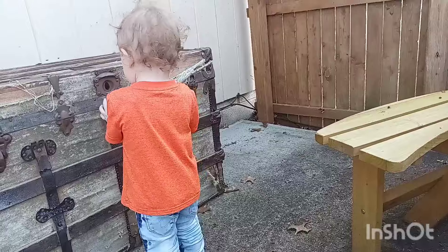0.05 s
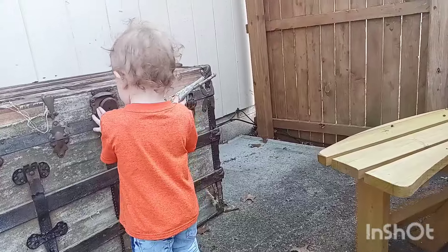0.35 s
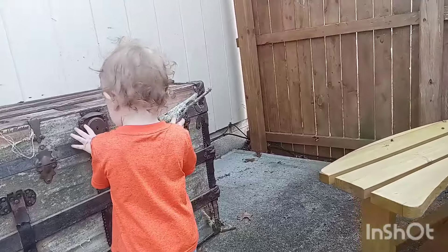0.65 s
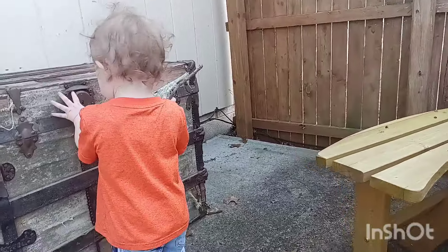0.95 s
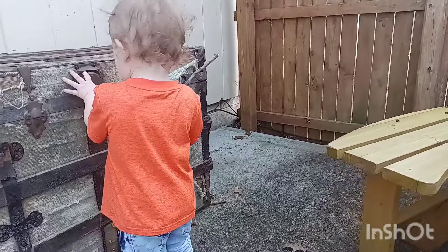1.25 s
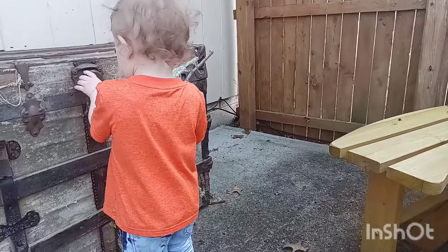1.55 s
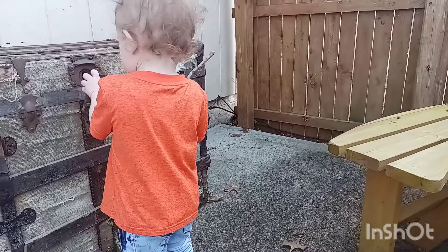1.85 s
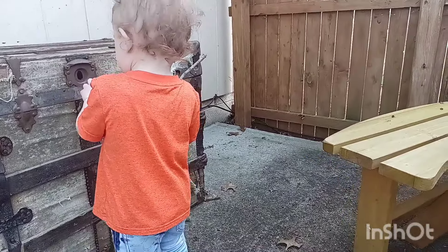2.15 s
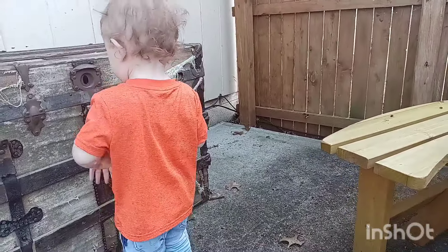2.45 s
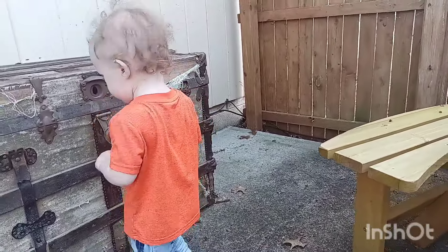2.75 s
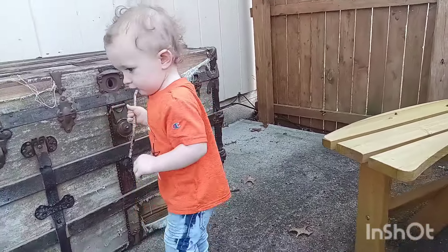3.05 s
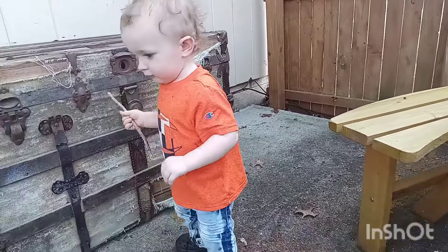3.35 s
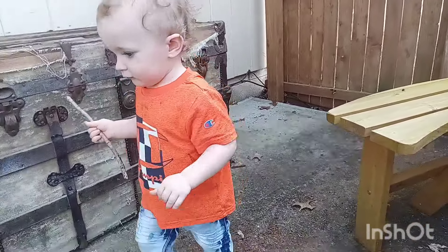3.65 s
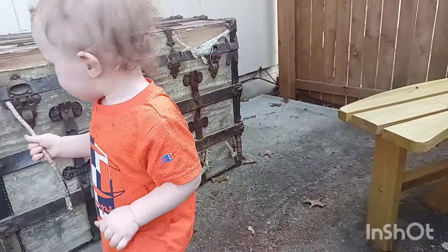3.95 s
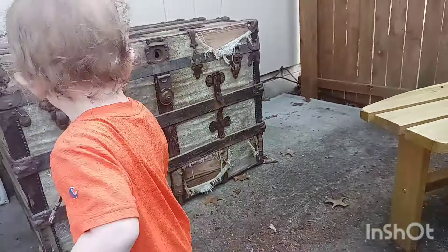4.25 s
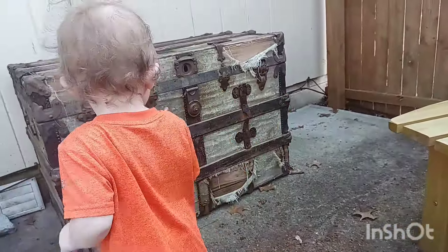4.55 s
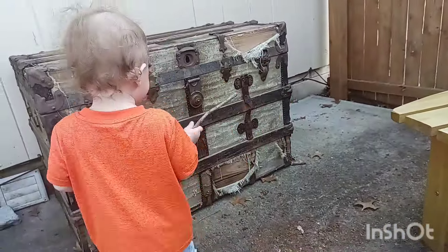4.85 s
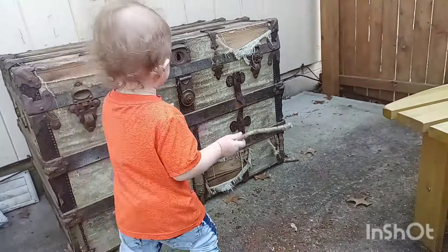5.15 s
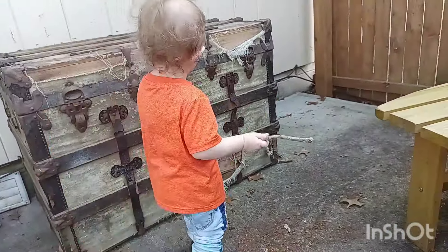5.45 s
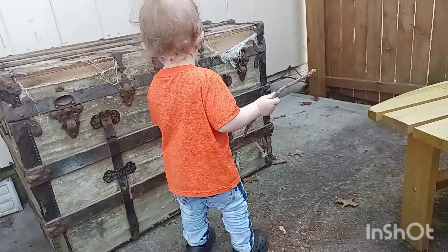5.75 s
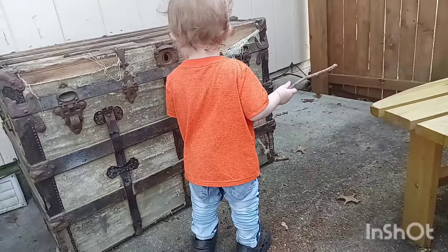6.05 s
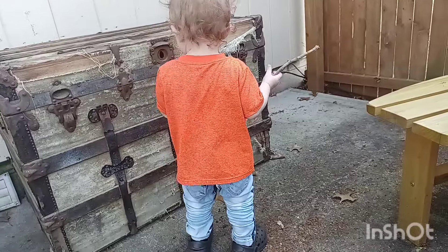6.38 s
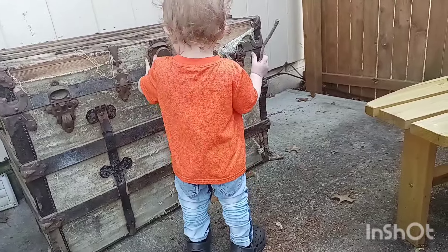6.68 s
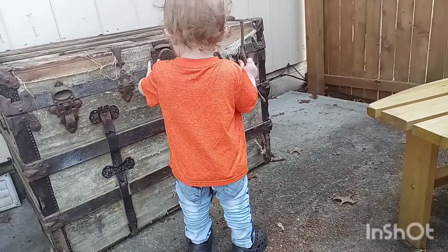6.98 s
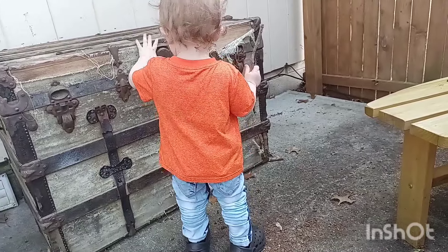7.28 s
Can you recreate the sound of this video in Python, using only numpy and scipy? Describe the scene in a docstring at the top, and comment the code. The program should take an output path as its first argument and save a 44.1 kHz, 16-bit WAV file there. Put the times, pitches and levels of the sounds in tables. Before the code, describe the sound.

A wooden trunk booms and rattles under a few knocks, then a stick clicks and small shoes scuff concrete, with faint birds early on.

```python
"""A soft bump on hollow wood, faint latch clinks and far bird whistles over a low outdoor hum.
A toddler plays at an old wooden trunk on a concrete patio, close to a hand-held phone. Hands bump the
box and rub its straps, shoes grind grit, a small stick taps. Loudest are the hard knocks: they boom in
the box modes, ring the planks, clash the iron fittings and rebound. Wall and fence add a short echo."""
import sys
import numpy as np
from scipy import signal
from scipy.fft import rfft, irfft, next_fast_len
from scipy.io import wavfile

SR = 44100
rng = np.random.default_rng(int(sys.argv[2]) if len(sys.argv) > 2 else 0)


def file_out(sig):
    """Save sig as 16-bit WAV at sys.argv[1]."""
    # one column per channel
    cols = np.atleast_2d(sig).T
    # limit, then scale
    lim = np.clip(cols, -1, 1)
    pcm = np.round(lim * 32767).astype(np.int16)
    wavfile.write(sys.argv[1], SR, pcm)


N = 327222
EVENT_T_S = np.arange(11264) / SR  # time within one event

# outdoor noise: f/Hz, relative density/dB
AIR_SPECTRUM = [(15, -21), (25, -29), (86, -3), (122, -8), (240, -10), (267, -15.5), (410, -18.5),
                (567, -25), (895, -22), (3530, -33.5), (3930, -33.5), (5010, -34), (7300, -28),
                (8580, -42.5), (15500, -60)]
# right port minus left, outdoor noise: f/Hz, gain/dB
AIR_RIGHT_EQ = [(100, -6.5), (400, -7), (1300, -3.5), (2400, -2.5), (4400, -3.5), (7600, -15), (11000, 1),
                (15000, 5)]
# right port minus left, all other sources: f/Hz, gain/dB
SOURCE_RIGHT_EQ = [(100, -6), (500, -6.5), (1300, -6.5), (2400, -11), (4400, -8), (7400, -25.5), (10000, 0),
                   (13000, -1.5)]
# deep far drone: t/s, relative level/dB
DEEP_DRONE_ENVELOPE = [(0, -63), (5, -62), (5.5, -51), (5.9, -43.5), (6.25, -45.5), (6.45, -61),
                       (7.05, -58), (7.4, -45.5)]
# upper far drone: t/s, relative level/dB
UPPER_DRONE_ENVELOPE = [(0, -47), (.6, -56), (1.3, -50.5), (2.2, -45), (3.9, -84), (5.8, -83), (6.1, -51.5),
                        (7.4, -56)]
# far birds: t/s, length/s, start f/Hz, end f/Hz, relative level/dB
BIRD_WHISTLES = [(.06, .19, 7350, 8020, -51.5), (0.205, 0.1, 4080, 3920, -54),
                 (0.363, 0.13, 4155, 3770, -47.5), (0.438, 0.19, 4030, 4050, -52.5),
                 (0.559, 0.0456, 4140, 3820, -40.5), (.88, 0.21, 3820, 3820, -70),
                 (1.21, .09, 4450, 4220, -59), (1.37, .16, 3930, 3925, -49)]

# iron fittings: f/Hz, relative density/dB
IRON_SPECTRUM = [(400, -29), (800, -11.5), (1400, -5), (1900, -5), (2800, -6), (3500, -10), (4250, -4.5),
                 (4900, -6.5), (5800, 0.5), (6600, 1.5), (7400, 4.5), (9000, -15), (11500, -35),
                 (15500, -54)]
# latch ring: f/Hz, level/dB, t60/s
LATCH_RING_MODES = [(1120, -31, 0.24), (2160, -18.5, 0.083), (2240, -5, 0.036), (2594, -6.5, 0.098),
                    (4000, -11, 0.035), (4170, 3, 0.044), (5410, 0, 0.059), (5640, -2, 0.061),
                    (5730, -3.5, 0.16), (6020, -1.5, 0.031), (6560, -12.5, 0.12), (7150, -25, .07),
                    (7900, -25, 0.114)]
# hand on latch: t/s, level/dB, tilt/(dB/oct)
LATCH_CLINKS = [(.264, -40, 15), (.45, -39, 4), (.59, -40, 2.5), (2.283, -50.5, -5.5), (2.367, -57, -14),
                (5.686, -34, -6), (6.252, -43, 0.5), (6.522, -54.5, -15.5), (6.77, -37.5, 8),
                (7.242, -56.5, 16)]
# hand on straps: t/s, level/dB, length/s
STRAP_RUBS = [(0.54, -48.5, 0.011), (1.582, -55.5, 0.029), (1.777, -57.5, 0.024), (2.36, -37.5, 0.01),
              (3.155, -43.5, .11), (5.669, -43.5, 0.033), (6.477, -54, 0.14), (6.737, -48, 0.11)]

# cracking grit: f/Hz, relative density/dB
GRIT_SPECTRUM = [(250, -47), (600, -8), (1100, -11), (1700, -4), (2700, -3.5), (3700, -6), (4400, -4),
                 (5200, -5.5), (6200, 0), (7400, 1), (8600, -16), (10500, -29.5), (13000, -49),
                 (15500, -72)]
# slipping rubber: f/Hz, relative density/dB
SOLE_SPECTRUM = [(600, -22), (1400, -11), (1750, 2), (2250, -0.5), (2700, -5.5), (3600, -9.5),
                 (9000, -28.5)]
# soles on concrete: t/s, level/dB, rise/s, hold/s, tilt/(dB/oct), drag re level/dB
SHOE_SCUFFS = [(3.39, -55, 0.011, 0.028, 0, -18), (3.526, -25.5, 0.024, 0.0095, 0, -29.5),
               (3.728, -28.5, 0.0048, 0.018, 1, -16), (4.043, -22.5, .0025, 0.027, 0, -27.5),
               (4.447, -44.5, 0.0071, 0.039, 1.5, -13), (4.6, -44.5, 0.058, 0.01, 4.5, -19.5),
               (4.84, -29.5, 0.017, 0.021, 2.3, -11), (5.157, -30, 0.013, 0.0023, 4, -28),
               (5.286, -33.5, 0.034, 0.007, 1.5, -51), (5.476, -32, 0.024, 0.022, 2.5, -21),
               (5.824, -22.5, 0.01, .014, 4.5, -37.5), (6.058, -50.5, 0.033, 0.029, 1, -14)]
# stick crack: f/Hz, relative density/dB
STICK_SPECTRUM = [(400, -35), (1000, -29.5), (1750, -5), (2400, 2.5), (3500, -0.5), (4350, -2.5),
                  (5100, -2), (6200, 4), (7200, 7), (9200, -9.5), (12000, -38), (15500, -72)]
# ticks of stick and snapping grit: t/s, crack/dB, tilt/(dB/oct), plank ring/dB
STICK_TAPS = [(2.976, -14, -7.5, -18), (3.4316, 9, -4, -32), (3.55, -9.5, -8, -18), (3.758, -6, 10, -17),
              (3.794, -16, -7, -38), (4.454, -13.5, -11, -45), (5.171, -5.5, 5, -42),
              (5.196, -6.5, -7, -25), (5.548, -11.5, -3.5, -22), (6.153, -23.5, -4.5, -40),
              (6.202, -28.5, -3.5, -41), (6.485, -26.5, 13, -35), (6.626, -8.5, -5.5, -2)]

# hollow box: f/Hz, level/dB, t60/s
HOLLOW_BOX_MODES = [(62.6, -21.5, 0.38), (79, -9, 0.16), (113.4, -4, 0.2), (135.9, -5.5, 0.2),
                    (174.3, -2, 0.19), (231.4, -4.5, 0.22), (295.5, -3, 0.18), (336.4, -6, 0.046),
                    (397, -5, 0.098), (441, -8.5, 0.24)]
# strongest plank modes: f/Hz, level/dB, t60/s
MAIN_PLANK_MODES = [(595, -7.5, 0.26), (662.5, -1, 0.099), (792, -4, 0.05), (991, 5.5, 0.045),
                    (1134, 0.5, 0.027), (1455, -6.5, 0.033), (1740, -6.5, 0.081), (1808, 3, 0.074),
                    (2030, -15.5, 0.26), (2280, -4, 0.032), (2710, -9.5, 0.133)]
# crowded plank modes: f/Hz, relative density/dB
PLANK_SPECTRUM = [(120, -30.5), (260, -3), (430, -6.5), (600, -6), (1000, -15), (1900, -13.5),
                  (3000, -20.5), (6000, -23.5), (16000, -63.5)]
# hand, knee or foot on trunk: t/s, relative boom/dB, contact/s
SOFT_BUMPS = [(.002, -29, 0.0047), (1.292, -53, 0.0026), (1.664, -29, 0.0049), (1.824, -37, 0.0053),
              (1.945, -33.5, 0.0079), (2.365, -42, 0.0023), (2.975, -40, 0.00086), (3.18, -31.5, 0.004),
              (3.227, -33.5, 0.0022), (3.561, -19.5, 0.0048), (3.734, -39.5, 0.0048), (4.872, -20, 0.012),
              (4.98, -29, .012), (5.438, -9, 0.02), (5.535, -19.5, 0.013), (5.686, -27.5, 0.0035),
              (5.7, -13, 0.012), (5.839, -23.5, 0.011), (6.332, -20.5, 0.0077), (6.523, -42, 0.0023),
              (6.767, -28.5, 0.0054)]
# knocks on trunk: t/s, relative boom/dB, planks/dB, contact/s, tilt/(dB/oct),
# first clash/dB, second clash/dB, rebound delay/s, rebound chatter/dB
HARD_KNOCKS = [(2.435, 3, -17.5, 0.0061, 0.5, -17.5, -18, 0.083, -69),
               (2.7231, -0.3, -19.5, 0.005, -0.2, -14, -12, .076, -34),
               (2.998, -1.5, -18, 0.0066, -2.5, -10.5, -34, .06, -34.5),
               (3.272, -8, -27, 0.00576, -2, -17.5, -31, 0.034, -32.5),
               (6.626, -16, -27.5, 0.0064, -3, -25, -34, 0.029, -56)]


def undb(db):
    """Decibels to gain."""
    return 10 ** (np.asarray(db) / 20)


def fade(t_s, t60_s):
    """Exponential decay, 60 dB down at t60_s."""
    return np.exp(-np.log(1000) * np.maximum(t_s, 0) / max(t60_s, 1e-3))


def burst(t60_s):
    """Decaying white noise."""
    return rng.standard_normal(len(EVENT_T_S)) * fade(EVENT_T_S, t60_s)


def unit(x):
    """Scale to unit energy."""
    return x / np.sqrt(np.sum(x ** 2))


def through(x, response):
    """Convolve, keeping the length of x."""
    size = next_fast_len(len(x) + len(response))
    return irfft(rfft(x, size) * rfft(response, size), size)[:len(x)]


def add(track, t_s, x):
    """Mix stereo x into the track from t_s on."""
    i = max(int(t_s * SR), 0)
    track[:, i:i + x.shape[1]] += x[:, :max(N - i, 0)]


def colour(spectrum, tilt_db_oct=0, size=512):
    """Minimum-phase response of a tilted spectrum."""
    hz, db = np.transpose(spectrum)
    bin_oct = np.log2(np.maximum(np.arange(size // 2 + 1) * SR / size, 1))
    bin_db = np.interp(bin_oct, np.log2(hz), db + tilt_db_oct * np.log2(hz / hz[0]))
    cepstrum = irfft(np.log(undb(bin_db)))
    cepstrum[1:size // 2] *= 2
    cepstrum[size // 2 + 1:] = 0
    return irfft(np.exp(rfft(cepstrum)))


def split(x, hz):
    """Second-order Butterworth pair: (low, high)."""
    g = np.tan(np.pi * hz / SR)
    poles = [1 + np.sqrt(2) * g + g * g, 2 * (g * g - 1), 1 - np.sqrt(2) * g + g * g]
    return signal.lfilter([g * g, 2 * g * g, g * g], poles, x), signal.lfilter([-1, 2, -1], poles, x)


def drift(rate_hz):
    """Smooth random drift, spread near 1."""
    return np.interp(np.arange(N) / SR * rate_hz, np.arange(1024), rng.standard_normal(1024))


def ring(modes, scatter_db=0, tilt_db_oct=0, pivot_hz=1000, wave=np.sin):
    """Decaying modes; the strike point tilts and scatters their levels."""
    out = np.zeros(len(EVENT_T_S))
    for hz, db, t60_s in modes:
        gain = undb(db + tilt_db_oct * np.log2(hz / pivot_hz) + scatter_db * rng.standard_normal())
        out += gain * wave(2 * np.pi * hz * EVENT_T_S) * fade(EVENT_T_S, t60_s)
    return out


def grains(rise_s, hold_s, t60_s, rate_hz, spread_db):
    """Tiny uneven impacts that swell, hold and decay."""
    n = len(EVENT_T_S)
    hits = (rng.random(n) < rate_hz / SR) * rng.choice([-1, 1], n)
    impacts = hits * undb(spread_db * np.clip(rng.standard_normal(n), -2.5, 2.5))
    swell = np.minimum(EVENT_T_S / max(rise_s, 1e-4), 1) ** 2
    return impacts / impacts.std() * swell * fade(EVENT_T_S - rise_s - hold_s, t60_s)


def port(x, direct_db, scatter_db, echo_db=-11, echo_delay_s=0.006, crossover_hz=600):
    """Path to one microphone port: bass whole, treble scattered nearby, echo off wall and fence."""
    bass, treble = split(signal.unit_impulse(len(EVENT_T_S)), crossover_hz)
    scatter = unit(burst(t60_s=0.023))
    echo = unit(burst(t60_s=0.16) * (EVENT_T_S > echo_delay_s))
    near = bass + undb(direct_db) * treble + undb(scatter_db) * split(scatter, crossover_hz)[1]
    return through(x, near + undb(echo_db) * split(echo, hz=120)[1])


def patio(x):
    """Each spot has its own echoes; the right port faces away and gets more scatter."""
    return np.array([port(x, direct_db=-1.5, scatter_db=-4), port(x, direct_db=-15.5, scatter_db=2.5)])


def air(level_db=-51.5, swell_db=0.9, crossover_hz=260):
    """Outdoor noise: restless rumble common to both ports, separate hiss in each."""
    response = unit(colour(AIR_SPECTRUM, size=8192))
    common, left, right = (through(rng.standard_normal(N), response) for _ in range(3))
    rumble = split(common, crossover_hz)[0] * undb(-swell_db * drift(rate_hz=21))
    left, right = (rumble + split(own, crossover_hz)[1] for own in (left, right))
    return undb(level_db) * np.array([left, through(right, colour(AIR_RIGHT_EQ))])


def drone(envelope, hz, waver, trim_db=-1.5, swell_db=3.5):
    """Far low tone, wandering in level and pitch."""
    db = np.interp(np.arange(N) / SR, *np.transpose(envelope)) + trim_db + swell_db * drift(rate_hz=14)
    pitch_hz = hz * (1 + waver * drift(rate_hz=8.1))
    return undb(db) * np.sin(2 * np.pi * np.cumsum(pitch_hz) / SR)


def birds(waver=0.0055, trim_db=-5, garden_db=5, garden_t60_s=0.15):
    """Thin gliding whistles, smeared on their way through the gardens."""
    out, t_s = np.zeros(N), np.arange(N) / SR
    wobble = 1 + waver * drift(rate_hz=110)
    for onset_s, length_s, start_hz, end_hz, db in BIRD_WHISTLES:
        on = (t_s >= onset_s) & (t_s < onset_s + length_s)
        progress = (t_s[on] - onset_s) / length_s
        hz = (start_hz + (end_hz - start_hz) * progress) * wobble[on]
        out[on] += undb(db + trim_db) * np.sin(np.pi * progress) * np.sin(2 * np.pi * np.cumsum(hz) / SR)
    return out + undb(garden_db) * through(out, unit(burst(garden_t60_s)))


def latch(tick_db=1, attack_s=0.0019):
    """Iron slides onto iron: rough tick, short ring."""
    out, iron = np.zeros((2, N)), unit(colour(IRON_SPECTRUM))
    attack = 1 - fade(EVENT_T_S, attack_s)
    for t_s, db, tilt_db_oct in LATCH_CLINKS:
        tick = undb(tick_db) * through(burst(t60_s=0.013), iron)
        tone = ring(LATCH_RING_MODES, scatter_db=1.5, tilt_db_oct=tilt_db_oct, pivot_hz=4700)
        add(out, t_s, undb(db) * patio((tone + tick) * attack))
    return out


def rattle(db, rise_s, hold_s, t60_s, tilt_db_oct, ring_db=-13):
    """Loose iron chatters on wood; the latch rings along."""
    chatter = undb(db) * grains(rise_s, hold_s, t60_s, rate_hz=5000, spread_db=5)
    iron = through(chatter, unit(colour(IRON_SPECTRUM, tilt_db_oct)))
    latch_ring = undb(ring_db) * through(chatter, unit(ring(LATCH_RING_MODES)))
    return patio(iron + latch_ring)


def rubs(rise_share=0.17):
    """A hand slides over the rusty straps."""
    out = np.zeros((2, N))
    for t_s, db, length_s in STRAP_RUBS:
        rise_s = rise_share * length_s
        add(out, t_s, rattle(db, rise_s, length_s - rise_s, t60_s=0.082, tilt_db_oct=3.5))
    return out


def grit(rise_s, hold_s, t60_s, tilt_db_oct):
    """Grit cracks under the sole."""
    cracks = grains(rise_s, hold_s, t60_s, rate_hz=1700, spread_db=3)
    return through(cracks, unit(colour(GRIT_SPECTRUM, tilt_db_oct)))


def rasp(rise_s, hold_s, t60_s):
    """Rubber slips in coarser jerks."""
    jerks = grains(rise_s, hold_s, t60_s, rate_hz=900, spread_db=2.5)
    return through(jerks, unit(colour(SOLE_SPECTRUM)))


def shoes(grind_t60_s=0.11, skid_delay_s=0.085, skid_re_drag_db=-2.5, right_db=-1.5):
    """Each step grinds under load, drags lightly and skids as the rubber catches."""
    out = np.zeros((2, N))
    for t_s, db, rise_s, hold_s, tilt_db_oct, drag_db in SHOE_SCUFFS:
        rubber_db = -4 - 1.75 * tilt_db_oct  # brighter step, less rubber
        grind = grit(rise_s, hold_s, grind_t60_s, tilt_db_oct)
        rubber = undb(rubber_db) * rasp(rise_s, hold_s, grind_t60_s)
        add(out, t_s, undb(db) * patio(grind + rubber))
        drag = grit(rise_s=0.037, hold_s=0.046, t60_s=0.25, tilt_db_oct=tilt_db_oct)
        add(out, t_s + rise_s, undb(db + drag_db) * patio(drag))
        skid = rasp(rise_s=0.044, hold_s=0.011, t60_s=0.15)
        add(out, t_s + skid_delay_s, undb(db + drag_db + skid_re_drag_db) * patio(skid))
    return out * undb([[0], [right_db]])  # feet left of the phone


def stick(buzz_db=-5, buzz_t60_s=0.073):
    """Dry crack with a brief buzz; the tip rings the planks."""
    out = np.zeros((2, N))
    for t_s, crack_db, tilt_db_oct, ring_db in STICK_TAPS:
        contact = signal.unit_impulse(len(EVENT_T_S)) + undb(buzz_db) * unit(burst(buzz_t60_s))
        crack = undb(crack_db) * through(contact, unit(colour(STICK_SPECTRUM, tilt_db_oct)))
        planks = undb(ring_db) * through(contact, unit(ring(MAIN_PLANK_MODES, scatter_db=5)))
        add(out, t_s, patio(crack + planks))
    return out


def blow(boom_db, planks_db, contact_s, tilt_db_oct, box_db=-5, ring_db=19, plank_attack_s=0.033):
    """A push drives the low box modes, rings the planks and clatters the loose ones."""
    push = np.sin(np.pi * np.minimum(EVENT_T_S / max(contact_s, 1e-3), 1)) ** 2  # longer is duller
    box = ring(HOLLOW_BOX_MODES, scatter_db=3.1, tilt_db_oct=tilt_db_oct, pivot_hz=148, wave=np.cos)
    boom = split(through(box, push / push.sum()), hz=52)[1]  # leaky box radiates no deep bass
    clatter = through(burst(t60_s=0.19), unit(colour(PLANK_SPECTRUM, tilt_db_oct)))
    plank_ring = undb(ring_db) * unit(ring(MAIN_PLANK_MODES, tilt_db_oct=tilt_db_oct))
    planks = (clatter + plank_ring) * (1 - fade(EVENT_T_S, plank_attack_s))
    return patio(undb(boom_db + box_db) * boom + undb(planks_db) * planks)


def bumps(planks_re_boom_db=-20, ref_contact_s=0.005, loss_db_per_doubling=13.5):
    """Soft blows: the longer the contact, the less the planks stir."""
    out = np.zeros((2, N))
    for t_s, boom_db, contact_s in SOFT_BUMPS:
        planks_db = boom_db + planks_re_boom_db - loss_db_per_doubling * np.log2(contact_s / ref_contact_s)
        add(out, t_s, blow(boom_db, planks_db, contact_s, tilt_db_oct=-1.3))
    return out


def knocks(clash_lead_s=0.0024, clash_gap_s=0.0115, shiver_re_clashes_db=-17,
           rebound_loss_db_per_s=182, planks_re_rebound_db=-31):
    """A hard knock booms, the iron clashes twice and shivers; a weaker rebound sets it chattering."""
    out = np.zeros((2, N))
    for (t_s, boom_db, planks_db, contact_s, tilt_db_oct,
         first_db, second_db, delay_s, chatter_db) in HARD_KNOCKS:
        add(out, t_s, blow(boom_db, planks_db, contact_s, tilt_db_oct))

        first_s = t_s - clash_lead_s
        second_s = first_s + clash_gap_s  # trunk wall swings back
        add(out, first_s, rattle(first_db, rise_s=0.001, hold_s=0.0023, t60_s=0.025, tilt_db_oct=0))
        add(out, second_s, rattle(second_db, rise_s=0.001, hold_s=0.0023, t60_s=0.025, tilt_db_oct=-1.5))
        shiver_db = 20 * np.log10(np.hypot(undb(first_db), undb(second_db))) + shiver_re_clashes_db
        add(out, second_s, rattle(shiver_db, rise_s=0.011, hold_s=0, t60_s=0.2, tilt_db_oct=-3))

        rebound_db = boom_db - rebound_loss_db_per_s * delay_s
        rebound = blow(rebound_db, rebound_db + planks_re_rebound_db, contact_s=0.006, tilt_db_oct=5.5)
        chatter = rattle(chatter_db, rise_s=0.0047, hold_s=0.032, t60_s=0.18, tilt_db_oct=1.5)
        add(out, t_s + delay_s, rebound + chatter)
    return out


def scene(left_lag_s=0.00084):
    """All sources at the two ports; the right is earlier and duller."""
    far = birds()
    far += drone(DEEP_DRONE_ENVELOPE, hz=49.5, waver=0.01)
    far += drone(UPPER_DRONE_ENVELOPE, hz=124.6, waver=0.026)
    left, right = knocks() + bumps() + rubs() + shoes() + stick() + latch() + far
    left, right = np.array([left, through(right, colour(SOURCE_RIGHT_EQ))]) + air()
    return np.array([np.pad(left, (int(left_lag_s * SR), 0))[:N], right])


def record(dry):
    """The phone rounds the highest peaks and cuts the top."""
    drive, cutoff_hz = 1.1, 15850
    lowpass = signal.ellip(10, 0.2, 80, cutoff_hz, fs=SR, output="sos")
    return signal.sosfilt(lowpass, np.tanh(drive * dry) / drive)


dry = scene()
out = record(dry)
file_out(out)
```